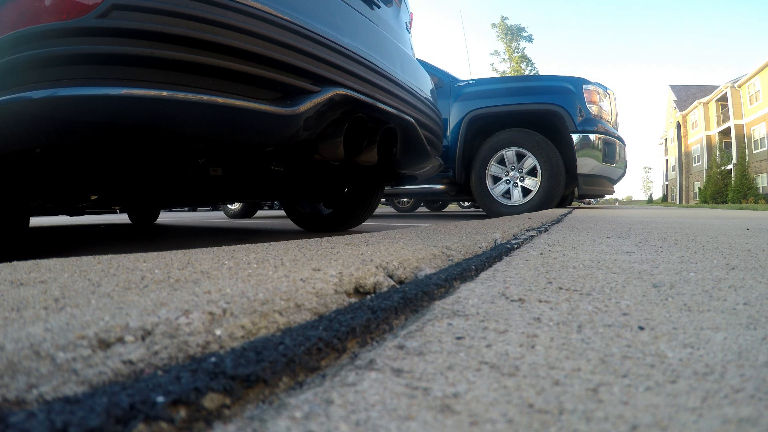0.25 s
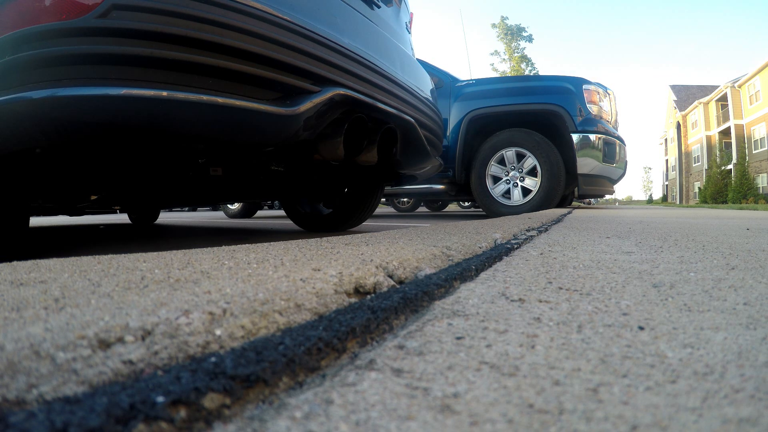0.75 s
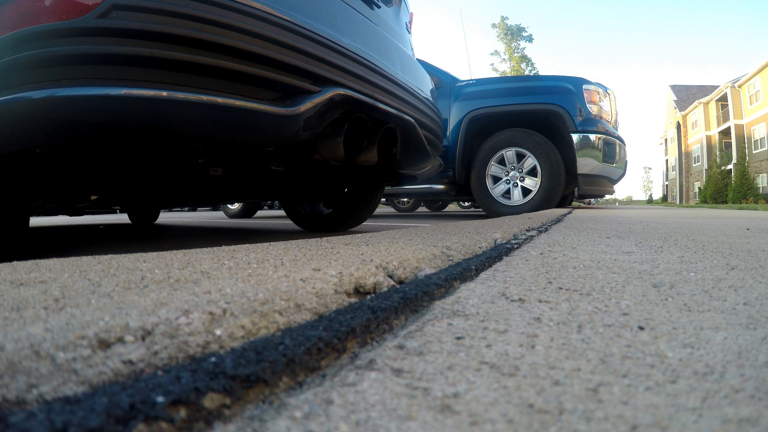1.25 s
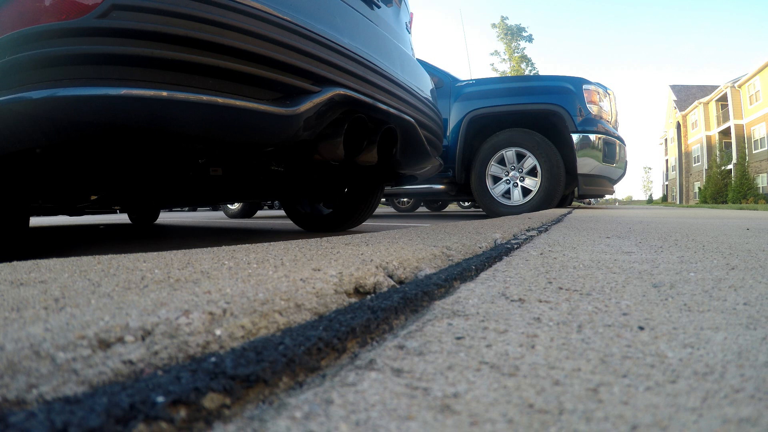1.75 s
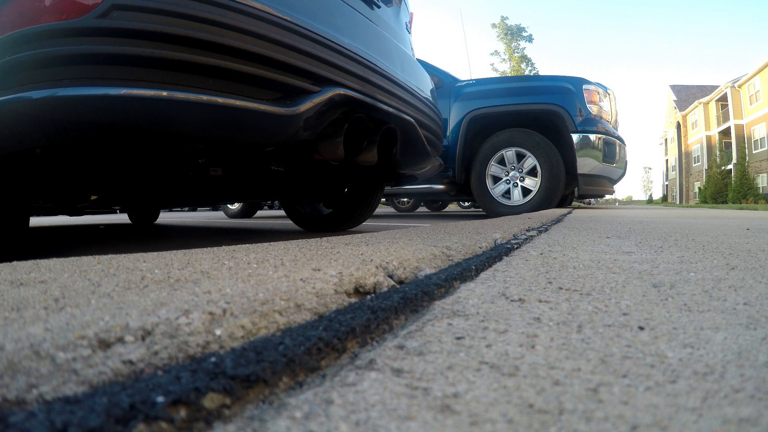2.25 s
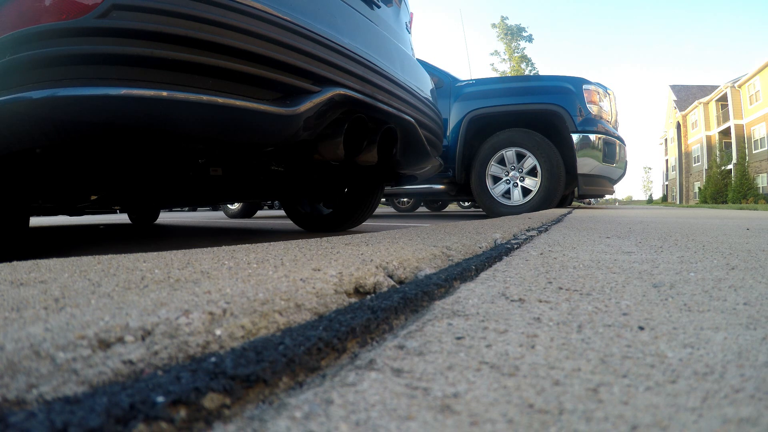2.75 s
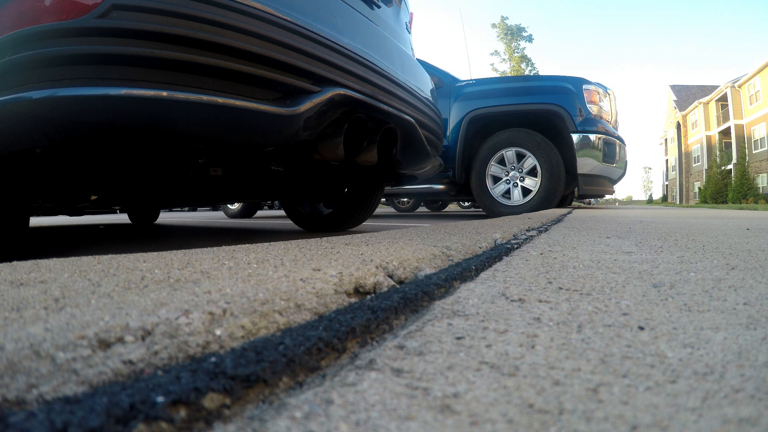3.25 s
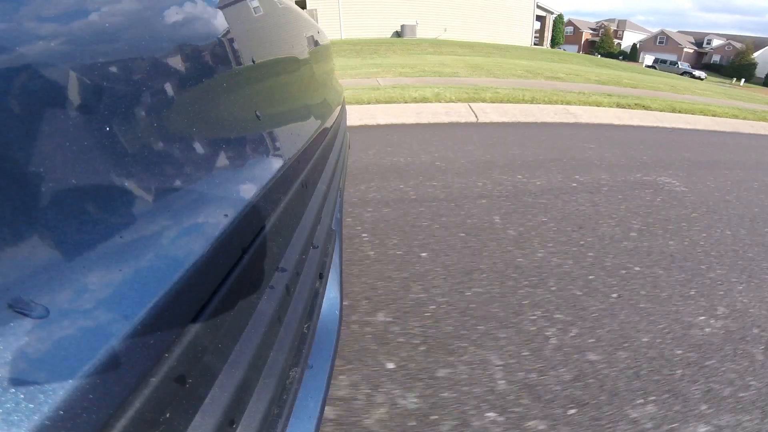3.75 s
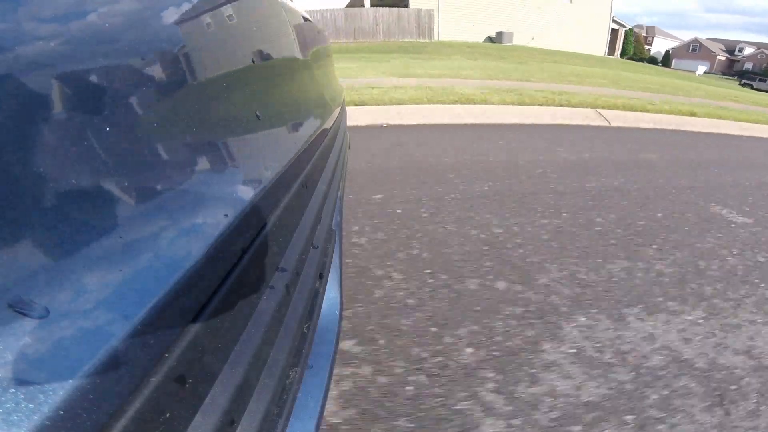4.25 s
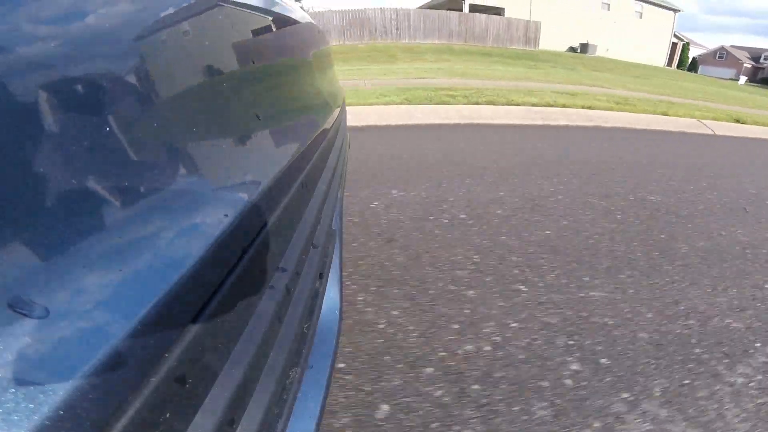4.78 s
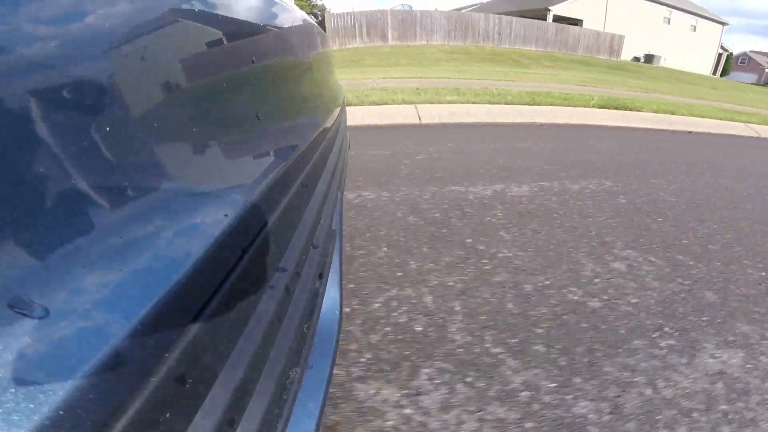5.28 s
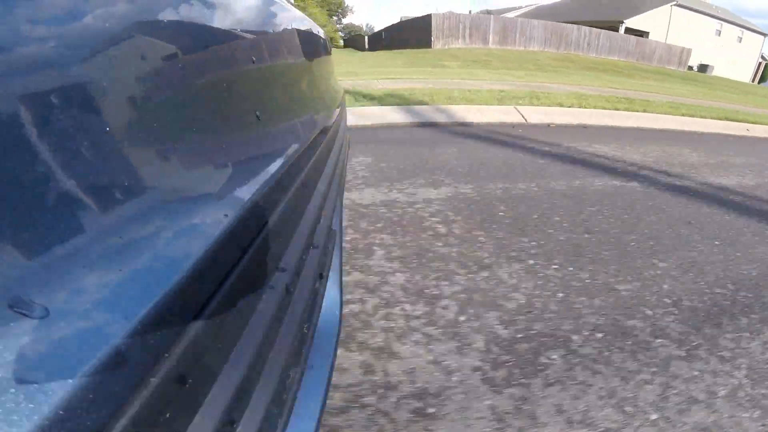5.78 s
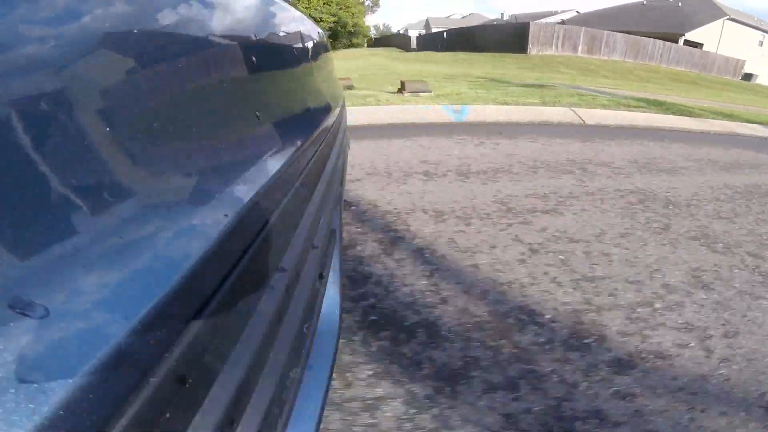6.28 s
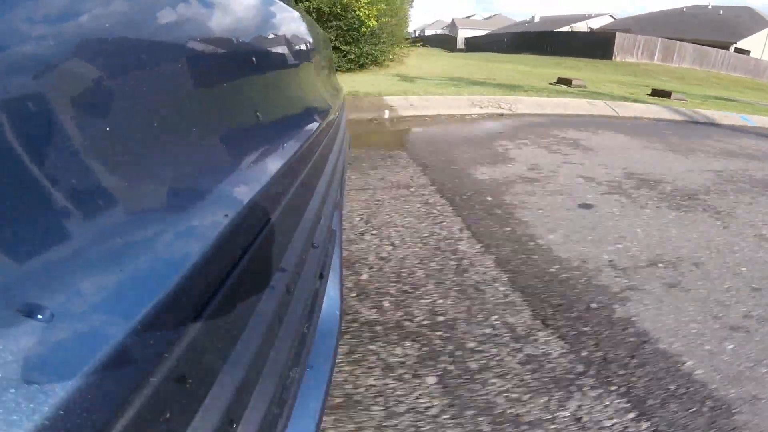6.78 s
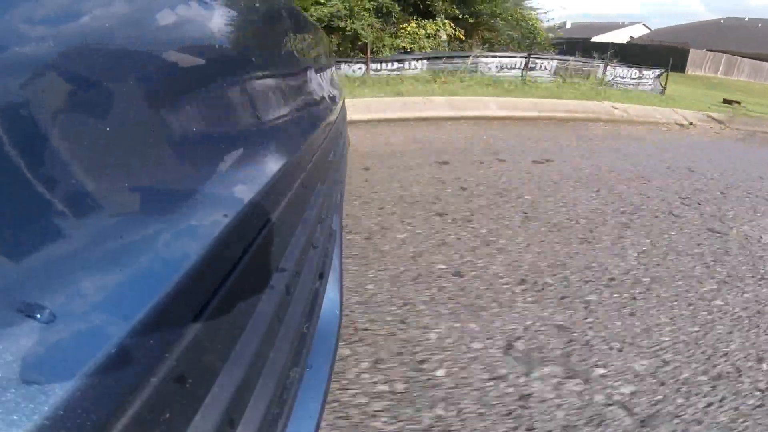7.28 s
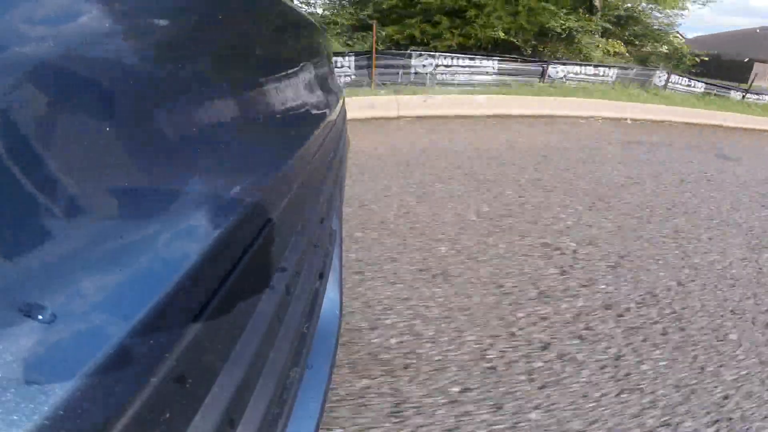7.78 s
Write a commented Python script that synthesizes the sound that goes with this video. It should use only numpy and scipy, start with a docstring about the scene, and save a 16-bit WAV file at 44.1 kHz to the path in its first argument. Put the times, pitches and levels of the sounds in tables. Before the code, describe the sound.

A turbocharged car idles, revs once and burbles down, then drives with a booming exhaust, scattered pops and a raspy pull.

```python
"""A turbocharged four-cylinder engine with a sports exhaust, heard near the tailpipe in two scenes.
Each firing pushes out a puff of gas: steady puffs boom, uneven ones burble, sharp ones ring the pipe.
Parked, it idles, revs once and burbles back down, with hissing gas and a falling belt whine.
Driving, heard from the bumper, it booms over tyre roar, then pulls across a wet patch and turns raspy.
The exhaust pops now and then; on the road, small stones tick and one gust-like buffet thuds."""
import sys
import numpy as np
from scipy import signal
from scipy.fft import rfft, irfft
from scipy.io import wavfile
from scipy.ndimage import uniform_filter1d

SR = 44100
rng = np.random.default_rng(int(sys.argv[2]) if len(sys.argv) > 2 else 0)


def to_wav(s):
    """Save 16-bit WAV."""
    ch = np.atleast_2d(s).T  # columns
    pcm = np.round(np.clip(ch, -1, 1) * 32767)  # PCM
    wavfile.write(sys.argv[1], SR, pcm.astype(np.int16))


N = 354123
TIME = np.arange(N) / SR
DRIVE_FROM_S = 3.716
# the muffler's deep rumble: (pitch [Hz], level [dB])
RUMBLE = [(16, -20.5), (32, -5.5), (46, 10), (80, -1), (130, -1), (165, -10.5), (260, -30.5), (500, -60)]


def parked_engine(boom_change, burble_change, lope_change):
    """Idle, one quick rev and the run-down, in stereo; speed and throttle set the levels."""
    # engine speed: (time [s], firing rate [Hz])
    speed = [(0, 37.4), (.7, 33.46), (1.23, 31.45), (1.31, 39.9), (1.39, 54.3), (1.7, 100.9), (1.8, 105),
             (2.26, 93.27), (2.5, 83.7), (2.95, 69.1), (3.71, 48.9)]
    # the exhaust booms most near its resonance: (firing rate [Hz], level [dB])
    boom_levels = [(31, -30), (37, -22.5), (47, -17), (80, -15), (105, -16)]
    # tone of the pipe, muffler, rushing gas and hiss: (pitch [Hz], level [dB])
    pipe_shape = [(70, 8), (105, -2), (140, -6), (175, -23.5), (210, -23.5), (313, -40), (420, -59.5),
                  (700, -62)]
    muffler_shape = [(90, -28), (170, 6), (260, -2), (350, -1.5), (480, -4), (565, -3.5), (625, -18.5),
                     (720, -12.5), (900, -29.5), (1500, -27.5)]
    rush_shape = [(450, -16.5), (720, -3), (950, 1.5), (1150, -4), (1320, -2), (1480, -1), (1740, -0.5),
                  (2150, -4.5), (2700, -10), (4000, -31.5)]
    hiss_shape = [(1800, -3), (2700, -15), (3100, -1), (3400, -4.5), (3850, 0), (4900, -7), (5500, -5.5),
                  (6100, -3.5), (7200, -10), (8200, -13.5), (10000, -15.5), (11500, -24), (15000, -41)]
    # the tailpipe's ringing notes: (pitch [Hz], width [Hz], level [dB])
    pipe_notes = [(702, 32, 0.5), (1295, 82, -1.5), (1767, 96, -9.5), (2090, 49, -7)]
    # base levels: (idling [dB], on throttle [dB], running down [dB], extra per idle speed gained [dB])
    laws = [(-26, -16, -31, -1), (-44, -36.5, -29.5, 8.3), (-63, -51, -49, 11.5), (-43, -36.5, -42.5, 5),
            (-56.7, -55, -57, 6.5), (-60, -57.5, -59, 5), (-80, -70.5, -74, 16)]
    idle_hz, open_s, shut_s = 34, 1.192, 1.764
    hz, = curves(speed)
    throttle = gate(open_s, shut_s, attack_s=.09, release_s=.045)
    running_down = (TIME > shut_s) * (1 - throttle)
    state = np.array([1 - throttle - running_down, throttle, running_down, hz / idle_hz - 1])
    bark_db, burble_db, lope_db, chuff_db, rush_db, hiss_db, rasp_db = np.array(laws) @ state
    boom_db = np.interp(hz, *np.transpose(boom_levels)) + 3.5 * throttle + boom_change
    bark_db -= 8 * np.exp(-((2 * hz - 172.5) / 18) ** 2)  # the muffler swallows the bark near 172.5 Hz
    turns = crank(hz, wobble=.0044)
    clicks = firings(turns, hz) * undb(.81 * per_firing(turns))
    low = pipe_tone(turns, hz, boom_db, bark_db, pipe_shape, flutter_db=5, lean=np.pi / 2, smear=np.pi / 2)
    low += burble(turns, hz, burble_db + burble_change, lope_db + lope_change, lope_upper_db=4)
    # the exhaust stream buffets left and right separately
    buffet = undb(boom_db - 20) * np.array([unit(colour(noise(), RUMBLE)) for _ in range(2)])
    chuff = undb(-11) * unit(colour(clicks, muffler_shape))
    chuff = chuff + wide_gas(turns, muffler_shape, side_db=-10, throb=.9, scatter_db=2)
    rush = undb(-10) * unit(colour(clicks, rush_shape))
    rush = rush + undb(3) * wide_gas(turns, rush_shape, side_db=1.5, throb=.18, scatter_db=-1)
    belt = undb(.6 * rush_db - 18) * belt_whine(turns)  # swells less than the gas does
    snarl = rasp(turns, hz, rasp_db, pipe_notes, rated_hz=103, gas_db=6, skirt_db=-18)
    hiss = undb(hiss_db + 5.5) * wide_gas(turns, hiss_shape, side_db=-5.5, throb=.14, scatter_db=6)
    deep = low * pan(-2.1) + buffet + undb(chuff_db) * chuff * pan(4.3)
    bright = (undb(rush_db) * rush + belt + snarl) * pan(3.7) + hiss * pan(-.5)
    left, right = deep + bright
    return np.array([left, np.pad(right, (1, 0))[:N]])  # sound reaches the right side slightly later


def driving_car(boom_change, burble_change, lope_change):
    """Coasting, then pulling, in mono; speed and load (how hard it works) set the engine's levels."""
    # engine speed: (time [s], firing rate [Hz])
    speed = [(3.72, 56.46), (3.93, 76.47), (4.12, 66.67), (4.36, 60.4), (4.5, 68.06), (4.65, 82.4),
             (4.86, 75.7), (5.0, 81.3), (5.2, 74.4), (5.34, 77.1), (5.6, 73.8), (6.45, 70.9), (6.78, 74.75),
             (6.96, 73.14), (7.2, 77.96), (7.32, 77.5), (7.68, 84.2), (8.03, 95.3)]
    # the accelerator: (time [s], load [0-1])
    pedal = [(3.72, 0.56), (3.85, .8), (3.92, 0.95), (4.06, 0.25), (4.55, .03), (5.85, 0.26), (6.25, 0.66),
             (6.75, 0.84), (7.15, 0.83), (7.38, 0.84), (7.56, 0.95), (8.03, 1)]
    # the exhaust booms most near its resonance: (firing rate [Hz], level [dB])
    boom_levels = [(60, -12.8), (67, -14), (74, -10.5), (80, -11.5), (95, -15.5)]
    # tone of the pipe, muffler and gas jet: (pitch [Hz], level [dB])
    pipe_shape = [(110, -3), (150, 2), (220, -10), (290, -18.5), (380, -25), (480, -38), (700, -52)]
    muffler_shape = [(100, -18.5), (200, 0), (310, 1.5), (400, -7), (470, -11.5), (600, -12.5), (800, -20),
                     (1500, -24)]
    jet_shape = [(300, -7.5), (500, -3), (700, 2), (1200, -3), (2000, -4.5), (3500, -14.5), (5200, -28.5),
                 (8000, -42), (14000, -49)]
    # the tailpipe's ringing notes: (pitch [Hz], width [Hz], level [dB])
    pipe_notes = [(716, 77, -16.5), (891, 101, 3.5), (1780, 110, -8.5), (2730, 330, -24),
                  (3380, 1200, -54.5)]
    rated_hz = 87.2
    hz, = curves(speed)
    load, = curves(pedal)
    boom_db = np.interp(hz, *np.transpose(boom_levels)) - .5 * load + boom_change + .7 * walk(12)
    waver_db = 4.5 * np.sqrt(np.clip(1 - load, 0, 1))  # the bark steadies as the load rises
    bark_db = -41.5 + 26.1 * load + waver_db * walk(16)
    rasp_db = -23.5 - 61 * (1 - load) + .69 * (hz - rated_hz)  # turbo boost grows with load and speed
    turns = crank(hz, wobble=.005)
    low = pipe_tone(turns, hz, boom_db, bark_db, pipe_shape, flutter_db=3, lean=np.pi / 4, smear=0)
    low += burble(turns, hz, -23 + burble_change, -33 + load + lope_change, lope_upper_db=-7)
    chuff = undb(-38.5 + 6.7 * load) * unit(colour(gas(turns, throb=.85, scatter_db=4), muffler_shape))
    snarl = rasp(turns, hz, rasp_db, pipe_notes, rated_hz, gas_db=2, skirt_db=-32)
    jet = undb(rasp_db - 18) * unit(colour(gas(turns, throb=.71, scatter_db=4.5), jet_shape))
    return low + chuff + snarl + jet + tyre_roar() + wet_patch() + housing_ring(hz, rasp_db)


def crank(hz, wobble):
    """Count the firings so far; the crank turns slightly unevenly."""
    return 1 + np.cumsum(hz) / SR + wobble * walk(40)


def firings(turns, hz):
    """One click a firing, shared between two samples, equally strong overall at any speed."""
    fired = np.diff(np.floor(turns), prepend=np.floor(turns[0])) > 0
    late = np.clip(turns % 1 * SR / hz, 0, 1)
    return (np.roll(fired * late, -1) + fired * (1 - late)) * np.sqrt(SR / hz)


def pipe_tone(turns, hz, boom_db, bark_db, shape, flutter_db, lean, smear):
    """The pressure wave leaving the pipe: a round boom at the firing rate, plus barking overtones."""
    angle = 2 * np.pi * turns
    pipe_hz, pipe_db = np.transpose(shape)
    passed_db = {k: np.interp(np.log(k * hz), np.log(pipe_hz), pipe_db) for k in range(2, 7)}
    overtones = np.cos(2 * angle + lean)  # lean 0 gives crests, pi / 2 a sawtooth
    for k in range(3, 7):
        gain = undb(passed_db[k] - passed_db[2] + flutter_db * walk(14))
        shift = (k - 1) * lean + smear * (k - 2) ** 2  # smear spreads the overtones in time
        overtones += gain * np.cos(k * angle + shift)
    return np.sqrt(2) * (undb(boom_db) * np.cos(angle) + undb(bark_db) * overtones)


def burble(turns, hz, burble_db, lope_db, lope_upper_db):
    """Weak and strong firings: random ones rumble, alternating ones lope (limp at half the rate)."""
    rumble = unit(colour(firings(turns, hz) * np.tanh(per_firing(turns)), RUMBLE))
    half = np.pi * turns
    lope = np.cos(half) + undb(lope_upper_db) * np.cos(3 * half)
    return undb(burble_db) * rumble + np.sqrt(2) * undb(lope_db) * lope


def rasp(turns, hz, level_db, notes, rated_hz, gas_db, skirt_db):
    """A sharp pressure front follows each firing and rings the tailpipe in fluttering bursts."""
    # the rasp briefly bites harder: (middle [s], length [s], rise [dB])
    flares = [(1.735, .06, 8), (1.82, 0.051, 6), (7.645, 0.025, 3.5), (7.94, 0.027, 0.5)]
    front = turns - .3 + .018 * walk(90)
    push = firings(front, hz) * undb(2.2 * per_firing(front))
    push += undb(gas_db) * gas(front, throb=1.5, scatter_db=2)
    push *= undb(1.6 * walk(32))
    heat = (hz / rated_hz) ** .3  # hotter gas at higher speed lifts the notes
    pipe = 0
    for note_hz, width_hz, db in notes:
        ring = resonate(push, note_hz * heat, width_hz)
        focused = resonate(ring, note_hz * heat, 4 * width_hz)
        pipe += undb(db) * (focused + undb(skirt_db) * ring)  # the skirt is the sound around the note
    flare_db, = swells(flares)
    return undb(level_db + flare_db) * unit(pipe)


def gas(turns, throb, scatter_db):
    """Swirling gas swells with every firing, each puff with its own strength."""
    puff = np.sin(np.pi * (turns % 1) ** .5) ** 2
    return unit(noise() * (1 + throb * puff * undb(scatter_db * per_firing(turns))))


def wide_gas(turns, shape, side_db, throb, scatter_db):
    """Gas noise that is only partly alike on the left and right."""
    mid, side = (unit(colour(gas(turns, throb, scatter_db), shape)) for _ in range(2))
    return mid + undb(side_db) * side * np.array([[1], [-1]])


def pops_and_buffet():
    """Low thuds with a faint crack: exhaust pops, and one gust-like buffet at 6.9 s."""
    # each thud: (time [s], thud peak [dB], crack compared with thud [dB])
    thuds = [(2.257, -15, -26), (2.979, -14.5, -24), (3.839, -11.5, -18.5), (3.996, -8.5, -18.5),
             (4.149, -10, -35), (4.19, -15.5, -28), (4.351, -18, -22), (5.263, -18, -24),
             (5.778, -14.5, -17), (5.968, -27, -20), (6.901, -4, -29.5), (7.338, -8, -20)]
    # tone of the thud and the crack: (pitch [Hz], level [dB])
    thud_shape = [(30, -11.5), (70, 8), (220, 5), (350, -11.5), (500, -14.5), (900, -39), (3000, -64)]
    crack_shape = [(300, -6.5), (600, -3.5), (1100, -5.5), (2000, -27.5), (6000, -58)]
    out = np.zeros(N)
    for s, db, crack_db in thuds:
        thud = burst(thud_shape, decay_s=.0016, grain=.055)
        crack = undb(crack_db) * burst(crack_shape, decay_s=.0092, grain=.17)
        add(out, s, undb(db) * (crack - thud))
    return out


def belt_whine(turns, pulley_ratio=2.625, slip=.02, flutter_db=3.5):
    """A belt-driven part sings a stack of tones that glides with the engine."""
    # tone of the whine: (pitch [Hz], level [dB])
    shape = [(250, -16), (400, -11.5), (520, 4), (570, 5.5), (640, -21.5), (900, -11), (1100, -28),
             (1310, -19), (1500, -17), (1700, -1), (2400, -24)]
    angle = 2 * np.pi * (pulley_ratio * turns + slip * walk(25))
    return colour(sum(undb(flutter_db * walk(12)) * np.cos(k * angle) for k in range(2, 9)), shape)


def tyre_roar():
    """Tyres rolling on the road make a gently wavering roar."""
    # tone of the roar: (pitch [Hz], level [dB])
    shape = [(250, -21.5), (480, -4), (750, -10), (980, 0.5), (1300, -4), (2000, -10.5), (3000, -20),
             (4000, -28), (5500, -32.5), (8000, -41), (14000, -64.5)]
    return undb(-43 + .89 * walk(18)) * unit(colour(noise(), shape))


def wet_patch(from_s=6.756, to_s=7.28, attack_s=.0078):
    """The tyres splash into water, swish through it and dry off."""
    # tone of the spray: (pitch [Hz], level [dB])
    shape = [(450, -7), (800, -7), (1130, 1.5), (1400, -5), (2000, -14), (3000, -28), (7000, -46.5)]
    swish = gate(from_s, to_s, attack_s, release_s=.32) * undb(-36 + 1.1 * walk(30))
    splash = gate(from_s, from_s + attack_s, attack_s, release_s=.021) * undb(-37.5)
    return (swish + splash) * unit(colour(noise(), shape))


def grit():
    """Small stones tick against the car's body."""
    # each stone: (time [s], peak [dB])
    stones = [(3.844, -30), (4.576, -38), (7.236, -35), (7.435, -37), (7.4589, -33)]
    # tone of a tick: (pitch [Hz], level [dB])
    shape = [(800, -5.5), (2500, 6), (4800, 0.5), (5600, -4), (6400, 0.5), (8000, -12), (12000, -21.5)]
    out = np.zeros(N)
    for s, db in stones:
        add(out, s, undb(db) * burst(shape, decay_s=.0023, grain=.21))
    return out


def housing_ring(hz, rasp_db):
    """Shaking from the road and exhaust makes the microphone's housing sing high up."""
    # tone of the housing: (pitch [Hz], level [dB])
    shape = [(4000, -17.5), (5700, -12.5), (6200, -0.5), (6550, -3), (7000, -14.5), (9000, -27.5),
             (14000, -53.5)]
    road_db = -64 + .5 * (hz - np.mean(hz[TIME > DRIVE_FROM_S]))
    shake = np.hypot(undb(road_db), undb(rasp_db - 29.5))
    return shake * unit(colour(noise(), shape)) * undb(1.8 * walk(22))


def undb(db):
    """Decibels to gain."""
    return 10 ** (np.asarray(db) / 20)


def unit(x):
    """Scale to an average power of 1."""
    return x / np.sqrt(np.mean(x ** 2))


def noise():
    """White noise of full length."""
    return rng.standard_normal(N)


def walk(rate):
    """Smooth random drift of size 1, changing about `rate` times a second."""
    k = int(SR / rate)
    steps = np.repeat(rng.standard_normal(N // k + 1), k)
    return unit(uniform_filter1d(uniform_filter1d(steps, k), k)[:N])


def per_firing(turns, size=1024):
    """One random value for each firing, held until the next."""
    return rng.standard_normal(size)[turns.astype(int) % size]


def curves(table):
    """The columns of a time table, one value a sample."""
    s, *columns = np.transpose(table)
    return [np.interp(TIME, s, c) for c in columns]


def swells(table):
    """Smooth bumps at the listed times, one curve in dB for each level column."""
    return sum(np.outer(db, np.cos(np.pi * np.clip((TIME - s) / length, -.5, .5)) ** 2)
               for s, length, *db in table)


def gate(on_s, off_s, attack_s, release_s):
    """Rise from 0 to 1, hold, then die away."""
    return np.clip((TIME - on_s) / attack_s, 0, 1) * np.exp(-np.maximum(TIME - off_s, 0) / release_s)


def colour(x, shape, size=8192):
    """Filter a sound to a (pitch [Hz], level [dB]) outline, fading beyond its ends."""
    hz, db = np.transpose(shape)
    log_hz = np.log(np.maximum(np.arange(size // 2 + 1) * SR / size, 1))
    outside = np.maximum(np.log(hz[0]) - log_hz, 0) + np.maximum(log_hz - np.log(hz[-1]), 0)
    cepstrum = irfft(np.log(undb(np.interp(log_hz, np.log(hz), db))) - 2 * outside)
    # make the filter ring only after a sound, never before
    cepstrum[1:size // 2] *= 2
    cepstrum[size // 2 + 1:] = 0
    return signal.oaconvolve(x, irfft(np.exp(rfft(cepstrum))))[:len(x)]


def resonate(x, hz, width_hz):
    """Ring at one pitch, which may move."""
    carrier = np.exp(2j * np.pi * np.cumsum(hz) / SR)
    pole = np.exp(-np.pi * width_hz / SR)
    return 2 * np.real(carrier * signal.lfilter([1 - pole], [1, -pole], x / carrier))


def burst(shape, decay_s, grain, size=4096):
    """A sudden push with a short noisy tail, filtered, with peak 1."""
    push = grain * rng.standard_normal(size) * np.exp(-np.arange(size) / SR / decay_s)
    push[0] += 1
    shaped = colour(push, shape)
    return shaped / np.abs(shaped).max()


def add(out, s, sound):
    """Mix a sound in at time s."""
    start = int(s * SR)
    out[start:start + len(sound)] += sound[:N - start]


def pan(left_db):
    """Two gains that make the left side left_db louder than the right."""
    return undb(np.array([[left_db], [-left_db]]) / 2)


def scene():
    """The parked scene switches straight to the driving scene."""
    # the fuel burns unevenly: (middle [s], length [s], change of boom [dB], burble [dB], lope [dB])
    stumbles = [(1.889, 0.13, -24, 1.5, 1), (2.05, 0.29, -12.5, -9.5, -11.5), (2.538, .2, -0.5, 4.5, 9.5),
                (3.423, 0.13, -4, 2, -10), (3.759, 0.12, -24, -9, 0), (3.997, 0.051, -22, 2.5, 11),
                (4.583, 0.25, -13, -7, 3), (5.048, 0.28, -8.5, -4, 4), (5.258, 0.32, -1.5, -3, 8),
                (5.991, 0.23, -10.5, -1, 3), (6.25, 0.54, -18, -2, 0), (6.545, 0.28, -2, 6.5, 8),
                (7.0, 0.35, -7, 7, 8), (7.298, 0.15, -4, 6, 0)]
    changes = swells(stumbles)
    moving = np.clip((TIME - DRIVE_FROM_S) / .0052, 0, 1)
    car = (1 - moving) * parked_engine(*changes) + moving * driving_car(*changes)
    return car + pops_and_buffet() + grit()


def record(dry, top_hz=15500):
    """The microphone loses the very highest treble."""
    return signal.sosfilt(signal.ellip(8, .2, 70, top_hz, fs=SR, output="sos"), dry)


dry = scene()
out = record(dry)
to_wav(out)
```